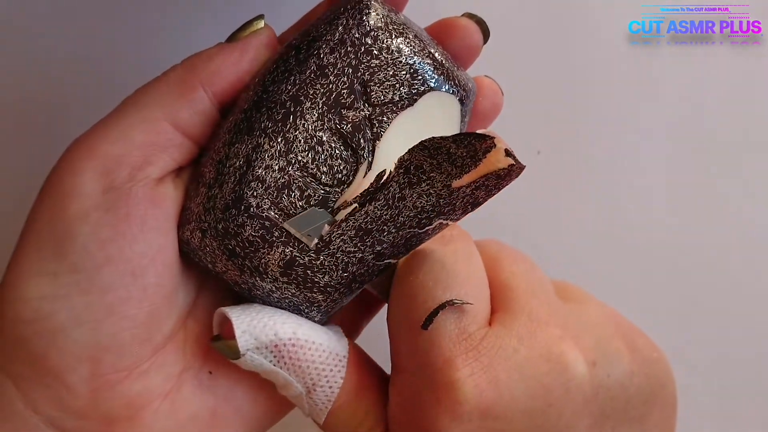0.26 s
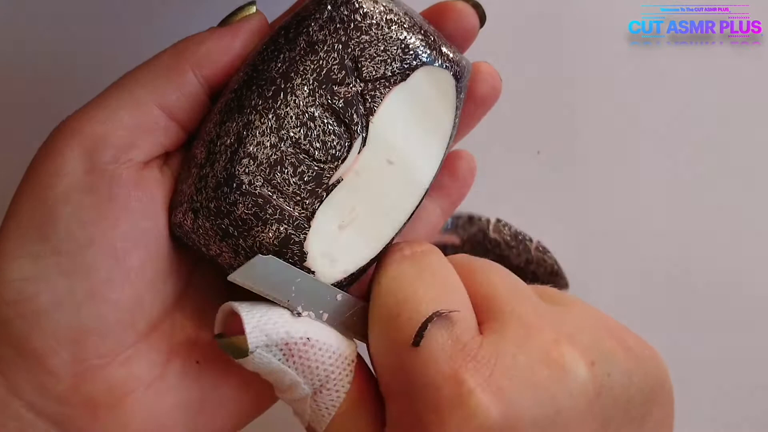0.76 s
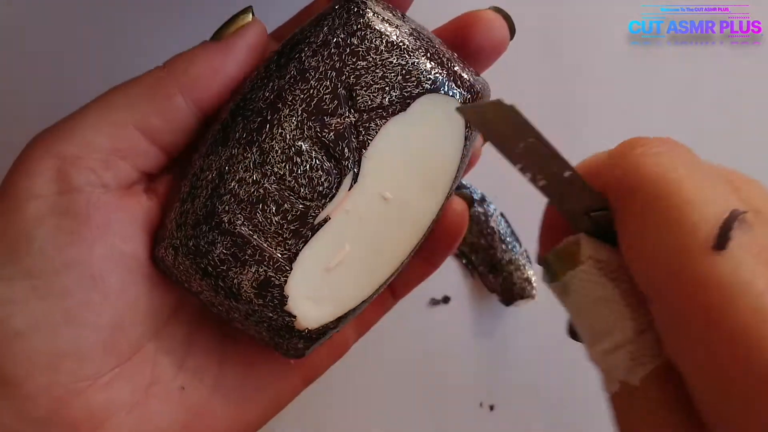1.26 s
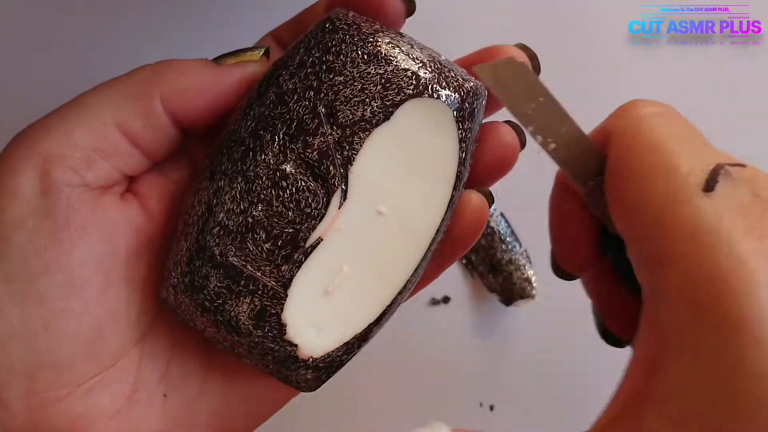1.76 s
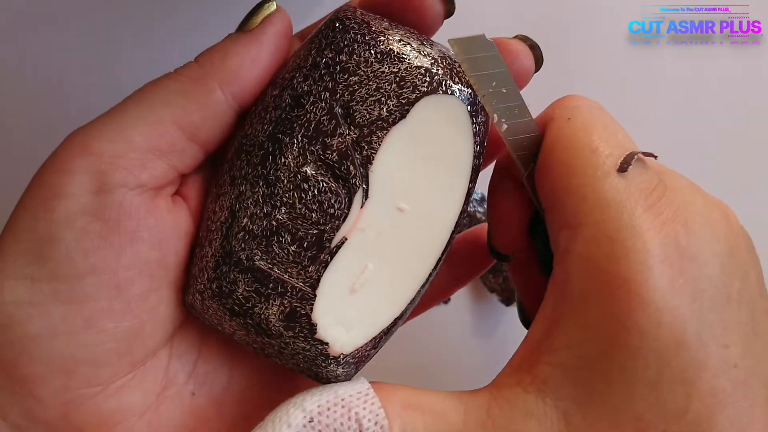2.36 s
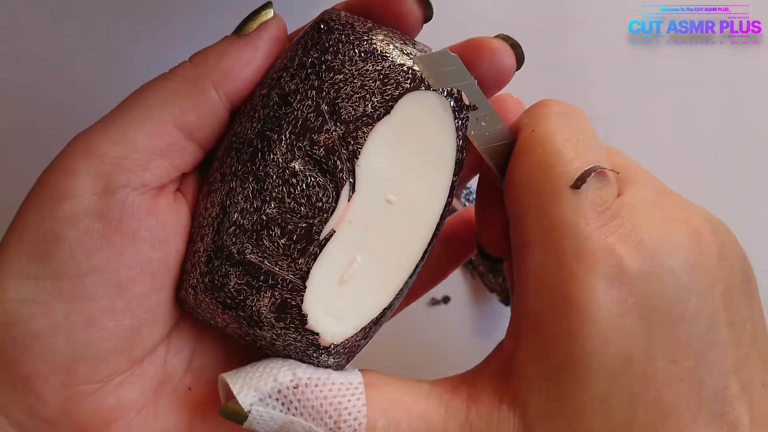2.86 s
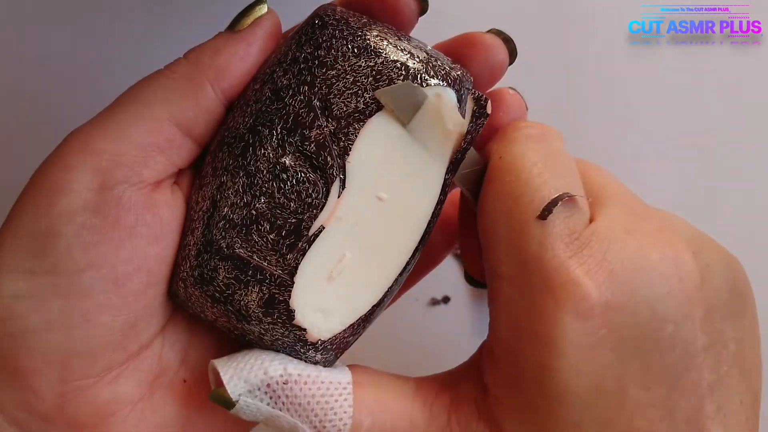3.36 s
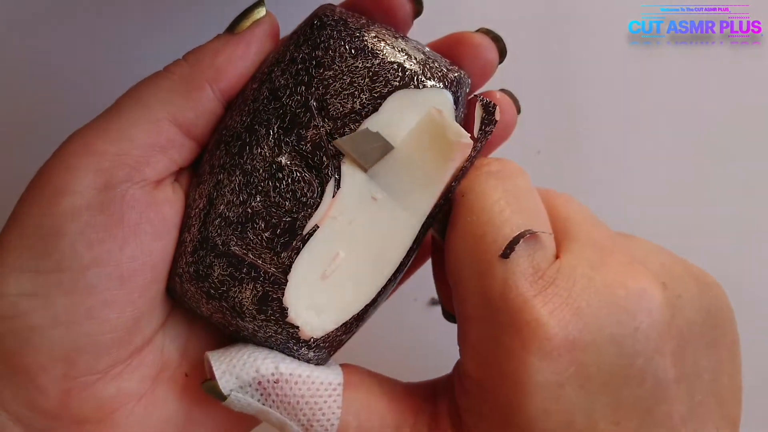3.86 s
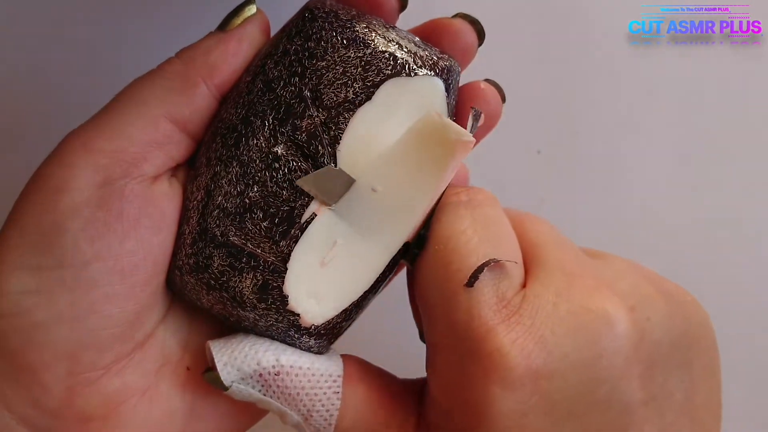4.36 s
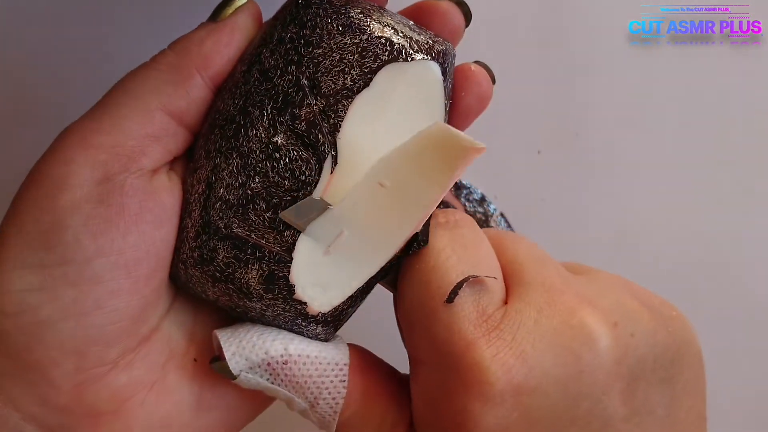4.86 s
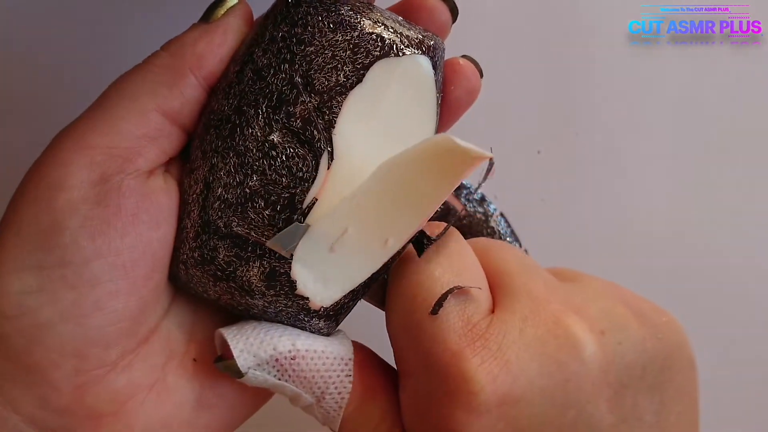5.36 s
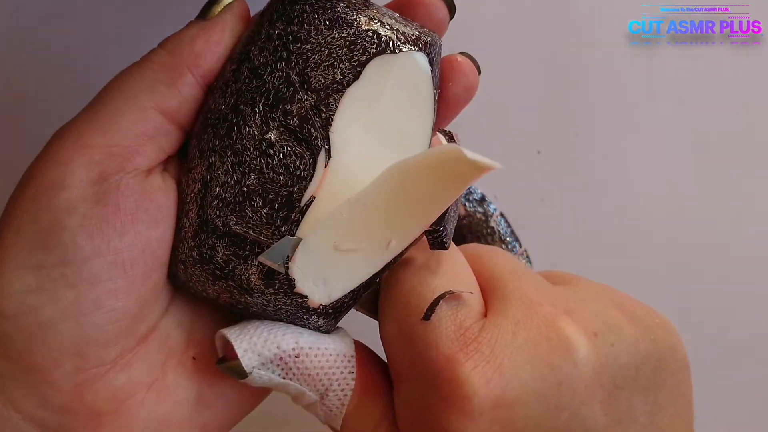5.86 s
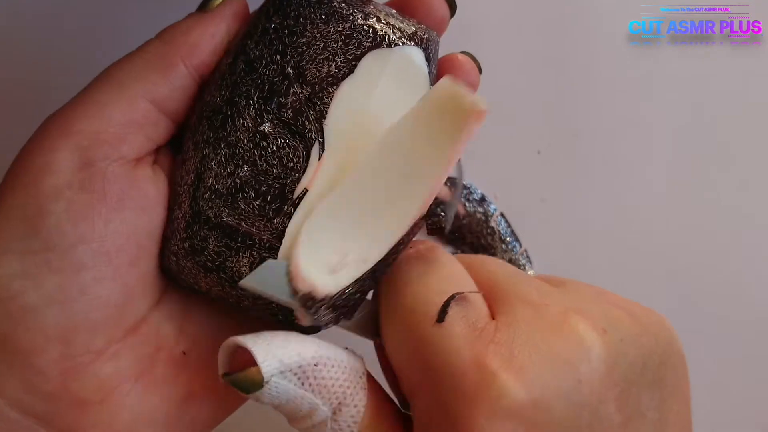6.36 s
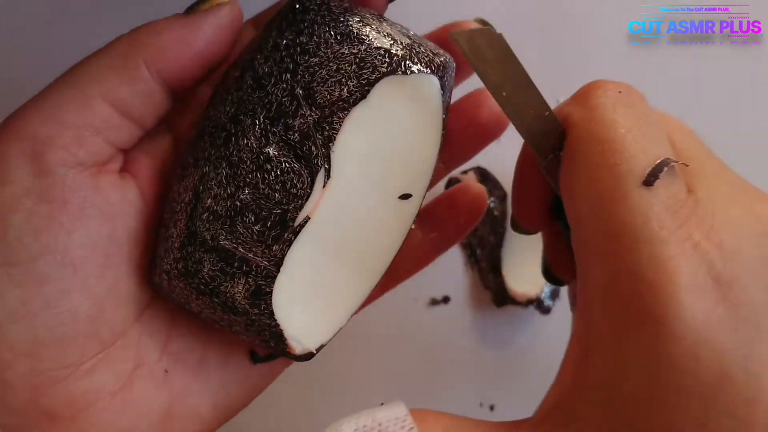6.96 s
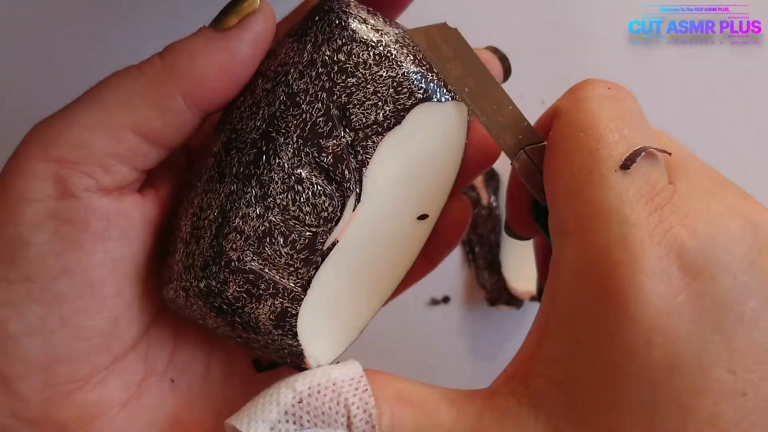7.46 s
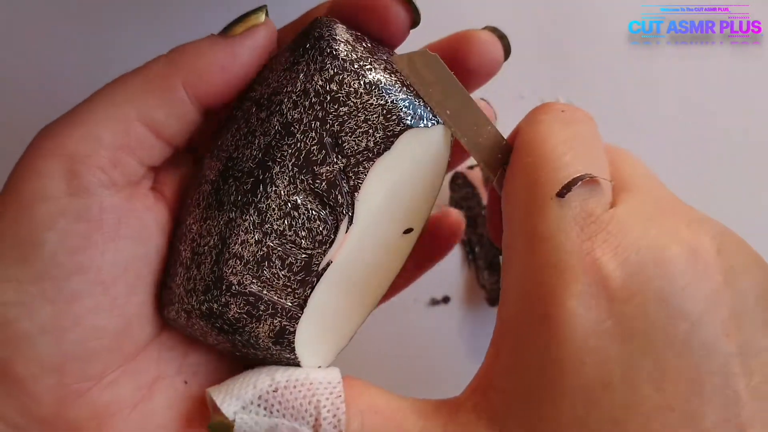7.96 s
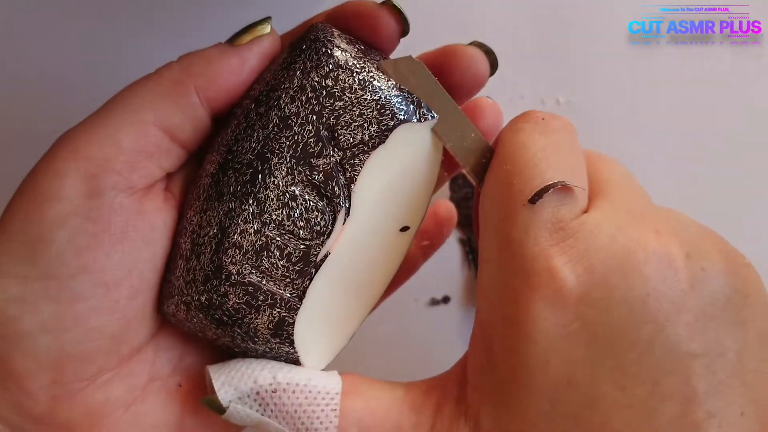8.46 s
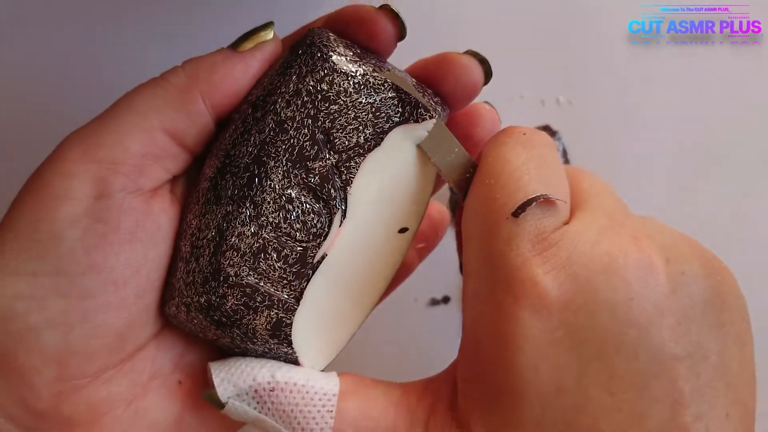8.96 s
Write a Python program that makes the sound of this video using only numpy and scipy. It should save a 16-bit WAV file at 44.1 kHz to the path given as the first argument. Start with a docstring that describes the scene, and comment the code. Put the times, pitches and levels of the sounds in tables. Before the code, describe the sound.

Close stereo pickup in a small room, with steady quiet rumble and hiss. From 0 to 0.3 s a few crisp snaps of brittle coating, then a strong crunch near 0.4. A slice lands at 0.6 with a sharp tick and hollow table thud, bouncing quickly, amid a brief slide. From 0.9 to 2.5 the blade clacks lightly in its handle, with a faint short metallic ping at 1.8 and the clearest clack at 2.5. Sparse snaps begin around 2.6; from 3.1 to 4.9 a soft uneven cutting hiss carries fine bright pops, densest after 3.7. Sparse ticks follow until 5.8, then a dense crunch at 5.9. Dull grip rubbing and small clacks lead to pieces dropping and bouncing at 6.5-6.8. Then near quiet, with faint clacks at 7.4 and 7.85 and a short crunch at 8, leaving only faint rustle and background.

```python
"""A craft knife pares a bar of soap with a hard glitter coat, close to a stereo microphone in a small room.
The coat snaps (short filtered noise clicks) and crunches (rough noise bursts); the cut is an uneven hiss.
Between strokes the blade clacks in its handle: noise rattles with a short pure ring.
Slices drop and bounce twice on a hollow table: noise ticks over a thud of decaying sine waves.
Under it lie the dull rub of a shifting grip, a faint rustle, and a steady background of rumble and hiss."""
import sys
import numpy as np
from scipy import signal
from scipy.fft import rfft, irfft, next_fast_len
from scipy.io import wavfile

SR = 44100
rng = np.random.default_rng(int(sys.argv[2]) if len(sys.argv) > 2 else 0)


def master_out(mix):
    """Clip the mix to full scale and print it as 16-bit PCM to the path in sys.argv[1]."""
    frames = np.transpose(np.atleast_2d(mix))
    ceiling = np.clip(frames, -1, 1)
    pcm = np.round(ceiling * 32767).astype(np.int16)
    wavfile.write(sys.argv[1], SR, pcm)


N = 407043
TIME = np.arange(N) / SR
BURST_SIZE = 4096   # samples in one short burst


def from_db(db):
    """Turn decibels into a gain."""
    return 10 ** (np.asarray(db) / 20)


def rms_one(x):
    """Scale to unit power."""
    return x / np.sqrt(np.mean(x ** 2) + 1e-20)


def at_hz(points, hz):
    """Read a curve between its points; pitch is spaced by ratio, as the ear hears it."""
    point_hz, value = np.transpose(points)
    return np.interp(np.log(np.maximum(hz, 1)), np.log(point_hz), value)


def bins(size):
    """List the frequencies of a transform, with 1 Hz as the lowest."""
    return np.maximum(np.fft.rfftfreq(size, 1 / SR), 1)


def hump(hz, centre_hz, octaves):
    """Shape of a resonance: 1 on top, one half at the given distance in octaves."""
    return 1 / (1 + (np.log2(hz / centre_hz) / octaves) ** 2)


def coloured(x, gain_db):
    """Filter with the given gain per frequency, never sounding before its input (minimum phase)."""
    size = 2 * (len(gain_db) - 1)
    # folding the cepstrum onto positive time makes the filter minimum-phase
    cepstrum = irfft(np.log(from_db(gain_db)))
    cepstrum[1:size // 2] *= 2
    cepstrum[size // 2 + 1:] = 0
    response = np.exp(rfft(cepstrum))
    return irfft(rfft(x, size) * response)[..., :x.shape[-1]]


LONG_HZ = bins(2 * next_fast_len(N // 2 + BURST_SIZE))   # frequencies for full-length noise


def stereo(pair, alike):
    """Mix two unrelated signals into left and right; alike = 1 makes both the same."""
    alike = np.clip(alike, -1, 1)
    middle = np.sqrt((1 + alike) / 2) * pair[0]
    side = np.sqrt((1 - alike) / 2) * pair[1]
    return middle + side * [[1], [-1]]


def stereo_noise(alike):
    """Full-length white noise in two channels."""
    return stereo(rng.standard_normal((2, N)), alike)


def panned(x, pan_db):
    """Left-right balance at constant power; positive is louder on the left."""
    return x * rms_one(from_db([[pan_db / 2], [-pan_db / 2]]))


def add(out, s, x):
    """Mix a sound in at a given time in seconds."""
    i = max(round(s * SR), 0)
    out[:, i:i + x.shape[1]] += x[:, :N - i]


def one_millisecond_level(x):
    """Level of a short sound if its energy were spread over one millisecond."""
    return np.sqrt(np.sum(x ** 2, axis=-1, keepdims=True) / (SR / 1000))


def burst(envelope, colour, db, tilt, pan_db, alike, grain_db, ring_hz=1000, ring_db=0, click=0):
    """Noise with uneven grains: a cluster of tiny fractures or contacts, with db as its strength."""
    hz = bins(BURST_SIZE)
    unevenness = from_db(grain_db * rng.standard_normal(BURST_SIZE))
    grains = rng.standard_normal((2, BURST_SIZE)) * unevenness
    grains[0, 0] += click   # a clean break starts with one sharp pulse
    octaves = np.log2(np.maximum(hz, 1200) / 5000)   # the tilt turns about 5 kHz and stops below 1.2 kHz
    gain_db = at_hz(colour, hz) + tilt * octaves + ring_db * hump(hz, ring_hz, 0.29)
    x = coloured(stereo(grains * envelope, alike), gain_db)
    return from_db(db) * panned(x / one_millisecond_level(x), pan_db)


def swell(seconds):
    """Fractures or contacts multiply up to the given time, then die out."""
    t = TIME[:BURST_SIZE] / max(seconds, 1e-4)
    return t * np.exp(-t)


def background(bass_hz=400):
    """Steady noise split into a slightly related stereo rumble and an almost unrelated hiss."""
    # colour of the background: (frequency [Hz], relative level [dB])
    floor_colour = [(20, -23), (40, -4.5), (75, 1.5), (160, -3), (300, -8.5), (600, -11), (1600, -14),
                    (2500, -20), (3800, -15.5), (5700, -31), (8000, -21.5), (11000, -18), (15500, -19)]
    # narrow bands that stand out: (frequency [Hz], half width [octaves], boost [dB])
    floor_peaks = [(1056, 0.016, 10.5), (2176, 0.13, 12.5)]
    level_db = -56.5
    colour_db = at_hz(floor_colour, LONG_HZ)
    colour_db = colour_db + sum(db * hump(LONG_HZ, hz, width) for hz, width, db in floor_peaks)
    bass_share = 1 / (1 + (LONG_HZ / bass_hz) ** 2)
    rumble = coloured(stereo_noise(alike=0.21), colour_db + 10 * np.log10(bass_share))
    hiss = coloured(stereo_noise(alike=0.049), colour_db + 10 * np.log10(1 - bass_share))
    return from_db(level_db) * panned(rms_one(rumble + hiss), pan_db=-3.0)


def room(x, early_db=5, early_s=0.069, first_s=0.0011, alike_hz=800):
    """Close reflections off table and hands, then a diffuse tail that lasts longest in the bass."""
    # time to fade by 60 dB: (frequency [Hz], time [s])
    room_t60 = [(200, 1.07), (1700, 0.5251), (3800, 0.7643), (9000, 0.4678), (16000, 0.37)]
    # colour of the echoes: (frequency [Hz], relative level [dB])
    room_colour = [(100, 3), (800, 4.5), (3500, 0.5), (8000, 2), (16000, 0)]
    t = TIME[:SR * 3 // 4]
    hz, centres = bins(2 * len(t)), np.geomspace(125, 16000, 8)
    white = rfft(rng.standard_normal((2, 2 * len(t))))
    # long waves reach both capsules alike
    white = stereo(white, alike=1 / (1 + (hz / alike_hz) ** 2))
    response = 0
    for centre, share in zip(centres, np.eye(len(centres))):
        band_gain = np.interp(np.log(hz), np.log(centres), share)
        band = irfft(white * band_gain)[:, :len(t)]
        fade_db = -60 * t / at_hz(room_t60, centre)
        response = response + band * from_db(at_hz(room_colour, centre) + fade_db)
    early_boost = from_db(early_db * np.exp(-t / early_s))
    onset = np.clip(t / first_s - .5, 0, 1)   # silent until the first reflection
    response = response * early_boost * onset
    response /= np.sqrt(np.sum(response ** 2) / 2)
    return signal.fftconvolve(x, response, axes=1)[:, :N]


def rub():
    """Dull rumble of skin dragging on the bar, only while the grip shifts."""
    # colour of the rub: (frequency [Hz], relative level [dB])
    rub_colour = [(40, -25), (100, -6), (160, 2), (230, -7.5), (320, -20), (600, -29), (2000, -55)]
    # the hand shifts its grip: (time [s], level [dB])
    grip_levels = [(6.06, -64), (6.12, -42.5), (6.2, -46), (6.26, -41), (6.3, -47), (6.42, -54.5),
                   (6.5, -32.5)]
    x = coloured(stereo_noise(alike=0.7838), at_hz(rub_colour, LONG_HZ))
    level_db = np.interp(TIME, *np.transpose(grip_levels), left=-np.inf, right=-np.inf)
    return from_db(level_db) * panned(rms_one(x), pan_db=-4.0)


def contacts():
    """List every landing and its two bounces: (s, tick dB, tilt, swell s, thud dB)."""
    # pieces land: (time [s], tick strength [dB], tilt [dB per octave], swell [s],
    # thud strength [dB], time to the first bounce [s]); strengths before the mix
    landing_list = [(0.588, -3.5, 1, 0.0015, -15, .057), (0.714, -16, -2.5, .0015, -21, 0.023),
                    (6.4706, -19, -1, .0041, -17, .054), (6.5229, -10.5, 1, 0.0011, -30, 0.011),
                    (6.527, -12.5, -1.5, 0.0047, -27, .037), (6.64, -24, 3.5, 0.0059, -31, 0.094)]
    gap_ratio = 0.93   # the second gap against the first
    # losses each time the count of contacts doubles [dB, dB, dB per octave]
    tick_loss, thud_loss, dulling = 19, 4.5, 9
    for s, tick_db, tilt, seconds, thud_db, gap_s in landing_list:
        for k in range(3):
            spent = np.log2(1 + k)
            yield s, tick_db - tick_loss * spent, tilt - dulling * spent, seconds, thud_db - thud_loss * spent
            s += gap_s * gap_ratio ** k


def landings(thud_db=-3, spread_db=2, phase_spread=0.52, build_cycles=0.93):
    """Each piece ticks on the table and sets its modes ringing, differently at every contact."""
    # colour of the ticks: (frequency [Hz], relative level [dB])
    land_colour = [(35, -13), (100, -8.5), (450, -4.5), (850, 3), (1400, -2.5), (2200, -4), (5500, -6),
                   (8500, -8), (16000, -9)]
    # ringing tones of the table top: (frequency [Hz], relative level [dB], time to fade by 60 dB [s])
    table_modes = [(88.4, -11.5, 0.13), (128.8, -24, 0.33), (159.4, -25, 0.33), (221.6, -12.5, 0.27),
                   (311.95, -8, 0.22), (450.7, -8, 0.12), (480.3, -26.5, 0.15), (533.5, -8, 0.1),
                   (709, -9.5, 0.1582), (768, -3, 0.1), (854, -3.5, 0.082), (923, -8, 0.095),
                   (1076, -20, 0.16), (1240, -16, .22), (1370, -19.5, 0.11)]
    ticks, thuds, t = np.zeros((2, N)), np.zeros((2, N)), TIME[:SR // 2]
    mode_hz, mode_db, t60 = np.transpose(table_modes)[:, :, None]
    for s, db, tilt, seconds, weight_db in contacts():
        tick = burst(swell(seconds), land_colour, db, tilt, pan_db=-1.5, alike=0.24, grain_db=9)
        add(ticks, s, tick)
        uneven_db = spread_db * rng.standard_normal(mode_hz.shape)
        strength = from_db(weight_db + thud_db + mode_db + uneven_db)
        phase = rng.uniform(0, 2 * np.pi, mode_hz.shape)
        # left and right hear slightly different phases [radians]
        phase = phase + phase_spread * rng.standard_normal((2, *mode_hz.shape))
        # the low modes take longest to spread through the board
        envelope = (1 - np.exp(-t * mode_hz / build_cycles)) * from_db(-60 * t / t60)
        tones = strength * envelope * np.sin(2 * np.pi * mode_hz * t + phase)
        add(thuds, s, np.sum(tones, axis=1))
    return ticks, panned(thuds, pan_db=-3.5)


def clacks():
    """The blade rattles in its plastic handle and against the bar; each knock rings for a few cycles."""
    # colour of the rattle: (frequency [Hz], relative level [dB])
    clack_colour = [(200, -22), (550, -27), (800, -7.5), (1300, -13.5), (1900, 4), (2400, -0.5), (3100, -6),
                    (4200, -3.5), (6000, -12.5), (9000, -18.5), (16000, -22.5)]
    # the knife clacks: (time [s], strength before the mix [dB], tilt [dB per octave],
    # swell [s], resonance [Hz])
    clack_list = [(0.879, -20.5, 2.5, 0.0066, 2060), (1.1318, -31.5, 1, 0.001907, 2230),
                  (1.2235, -35.5, 2, 0.0017, 2383), (1.7945, -27, 4, 0.0014, 4500),
                  (2.0598, -27.5, -1, 0.0012, 1930), (2.1864, -22.5, -0.5, 0.0013, 1840),
                  (2.4848, -12, 2, 0.002, 2190), (6.1016, -20.5, -1, .0012, 2074),
                  (6.24, -25, 3, 0.0007288, 1019), (6.3583, -26, 0.5, 0.0042, 2364),
                  (7.3646, -34.5, -4, 0.0017, 1940), (7.3767, -25, 2, 0.0012, 2185),
                  (7.8546, -31, 5.5, 0.0014, 3700)]
    # the flicked free blade: (frequency [Hz], peak before the mix [dB], time to fade by 60 dB [s])
    blade_ping = (4565, -46, 0.17)
    ping_s = 1.795   # moment of the flick
    pan_db, knock_db = -2, -3   # left-right; pure ring against the rattle
    rattles, knocks = np.zeros((2, N)), np.zeros((2, N))
    for s, db, tilt, seconds, hz in clack_list:
        envelope = swell(seconds)
        rattle = burst(envelope, clack_colour, db, tilt, pan_db, alike=0.29, grain_db=2.0,
                       ring_hz=hz, ring_db=0.5)
        add(rattles, s, rattle)
        knock = envelope * np.sin(2 * np.pi * hz * TIME[:BURST_SIZE])
        knock /= one_millisecond_level(knock)
        add(knocks, s, from_db(db + knock_db) * panned(knock, pan_db))
    hz, db, t60 = blade_ping
    t = TIME[:SR]
    ping = from_db(db - 60 * t / t60) * np.sin(2 * np.pi * hz * t)
    add(rattles, ping_s, ping * np.ones((2, 1)))
    return rattles, knocks


def sliding():
    """Level of the slides: each builds up, holds and dies away, over the rustle of the grip."""
    # blade slides through soap or fingers over the coat: (start [s], end [s], level before unevenness [dB])
    slide_list = [(0, 0.044, -53.5), (0.48, 0.73, -53), (0.953, 1.034, -48), (1.096, 1.395, -59.5),
                  (2.663, 2.81, -61), (3.077, 4.887, -61), (5.852, 6.38, -57.5), (6.546, 6.82, -52)]
    attack_s, release_s = 0.028, 0.069
    hold_db = -74   # faint rustle of the bar held in the hand
    start, end, db = np.transpose(slide_list)[:, :, None]
    t = TIME[::64]   # a coarse clock is enough for a slow level
    fade = np.maximum(start - t, 0) / attack_s + np.maximum(t - end, 0) / release_s
    level = np.max(from_db(db) * np.exp(-fade), axis=0)
    return np.interp(TIME, t, np.maximum(level, from_db(hold_db)))


def scrape(per_s=350, grain_db=5.5, grain_share_db=2.5, uneven_db=4.5):
    """Soft, uneven hiss of the cut with a sprinkle of glitter grains popping under the edge."""
    # colour of the scrape: (frequency [Hz], relative level [dB])
    scrape_colour = [(500, -28), (2000, 1), (3800, 0.5), (4800, -3), (6000, 2), (9000, 0), (13000, 4),
                     (16000, -5.5)]
    knots = np.arange(0, TIME[-1], .025)   # the drag wanders in steps of 25 ms
    drag_db = uneven_db * np.interp(TIME, knots, rng.standard_normal(len(knots)))
    level = sliding() * from_db(drag_db)
    born = rng.random(N) < per_s / SR
    size = from_db(grain_db * np.minimum(rng.exponential(1, N), 3.5))
    # each pop dies away in 1.7 ms
    grains = rms_one(signal.lfilter([1], [1, -np.exp(-1 / (0.0017 * SR))], born * size + 1e-18))
    hiss = rms_one(coloured(stereo_noise(alike=0.068), at_hz(scrape_colour, LONG_HZ)))
    popping = np.hypot(1, from_db(grain_share_db) * grains)
    return level * panned(hiss * popping, pan_db=1.0)


def cracks():
    """A crack runs through the coat as a rough burst of fractures."""
    # colour of the cracks: (frequency [Hz], relative level [dB])
    crack_colour = [(150, -29.5), (550, -26.5), (800, -7.5), (1100, -13), (1800, -10.5), (2600, -6),
                    (4000, -7.5), (6000, -3.5), (10000, -4.5), (14000, -0.5), (16000, -5.5)]
    # runs of fractures: (time [s], strength before the mix [dB], left-right [dB],
    # swell [s], flake resonance [Hz])
    crack_list = [(0.358, -12.5, 2.5, 0.0023, 4300), (0.3694, -7, -5.5, 0.0072, 3950),
                  (0.3953, -2.5, -0.5, 0.0034, 4100), (2.548, -21.5, -1, 0.0023, 5300),
                  (4.8721, -21.5, -2, 0.001502, 3700), (5.9239, -17.5, 14, 0.0017, 4029),
                  (5.9325, -8, -7, 0.01, 3938), (5.946, -5, 3, 0.000784, 13300),
                  (5.9505, -7, 1.5, 0.0017, 14300), (5.967, -7.5, 0, .0013, 7800),
                  (6.338, -24, 2.5, 0.006, 2314), (7.9789, -10, -6, 0.006, 3700),
                  (7.9824, -10.5, 2, 0.0035, 3400)]
    out = np.zeros((2, N))
    for s, db, pan_db, seconds, hz in crack_list:
        tilt = -2.4 - 0.2 * db   # dB per octave: small, weak flakes sound brighter
        crack = burst(swell(seconds), crack_colour, db, tilt, pan_db, alike=.05, grain_db=7.5,
                      ring_hz=hz, ring_db=14)
        add(out, s, crack)
    return out


def scatter():
    """Faint snaps at random moments of each spell of crackle: (s, strength dB, tilt)."""
    # the blade is in the coat: (start [s], end [s], snaps per second [1/s],
    # middle strength before the mix [dB], middle tilt [dB per octave])
    crackle_list = [(2.752, 3.7, 9.2, -39, -3), (3.749, 4.8, 14, -37.5, 11), (5.807, 5.92, 30, -32, -5)]
    spread_db, tilt_spread = -1, 3   # each multiplied by a random number from -2 to 2
    rows = []
    for start, end, per_s, db, tilt in crackle_list:
        gaps, spread = rng.exponential(1, 64), rng.uniform(-2, 2, (64, 2))
        times = start + np.cumsum(gaps) / max(per_s, 1)
        for s, (a, b) in zip(times, spread):
            if s < end:
                rows.append((s, db + spread_db * a, tilt + tilt_spread * b))
    return rows


def snaps(crack_s=.0001, flutter_s=0.0023, flutter_db=-12):
    """One sharp break of the coat, then the flake flutters for a millisecond or two."""
    # colour of the snaps: (frequency [Hz], relative level [dB])
    snap_colour = [(300, -46), (1600, -29), (2600, -12.5), (4000, -3), (5500, -9), (10500, -10.5),
                   (13000, 1), (16000, -6)]
    # the clearest snaps: (time [s], strength before the mix [dB], tilt [dB per octave])
    snap_list = [(0.0156, -19, -3), (0.1943, -34.5, -4.5), (0.225, -11, 0), (0.2906, -27.5, -2),
                 (0.576, -21.5, 0), (2.659, -22.5, 3.5), (2.7357, -23.5, -4), (2.9201, -28.5, -5),
                 (3.062, -31, -5.5), (3.674, -20, 6), (3.783, -30, 9), (3.8215, -14, 9), (3.916, -22, 7),
                 (3.9347, -27.5, -1.5), (3.9768, -26.5, 5), (4.0411, -22.5, 9), (4.075, -18, 11.5),
                 (4.132, -22.5, 12), (4.2748, -22, 9.5), (4.359, -19.5, 9.5), (4.3925, -22, 7),
                 (4.448, -12.5, 4), (4.4768, -24.5, 1.5), (4.4938, -28.5, 2), (4.5506, -24.5, 0.5),
                 (4.6344, -23.5, 3.5), (4.699, -22.5, 2.5), (4.8015, -27, 0.5), (4.8563, -25, 4),
                 (5.306, -28.5, 5), (5.3739, -33.5, -1), (5.409, -34, 1.5), (5.511, -27.5, 3),
                 (5.536, -28, 1.5), (5.5779, -23, -4.5), (5.7711, -33.5, -2), (5.8587, -30, 0),
                 (5.8764, -13, 1), (5.9005, -21, -0.5), (6.311, -25.5, -0.5), (6.449, -31, -7),
                 (6.465, -23, -1)]
    out, t = np.zeros((2, N)), TIME[:BURST_SIZE]
    envelope = np.exp(-t / crack_s) + from_db(flutter_db) * np.exp(-t / flutter_s)
    for s, db, tilt in snap_list + scatter():
        pan_db = 0.5 + 0.21 * tilt   # the finest, brightest chips fly off to the left
        add(out, s, burst(envelope, snap_colour, db, tilt, pan_db, alike=0.39, grain_db=4, click=2.5))
    # the cut is nearer to the left capsule and reaches it a few samples sooner
    out[1] = np.roll(out[1], 5)
    return out


def scene():
    """Mix the close sounds with their room echo; ticks and clacks carry the most echo for their level."""
    snap, crack = snaps(), cracks()
    clack, knock = clacks()
    tick, thud = landings()
    direct = from_db(0.5) * snap + from_db(0.3) * crack + from_db(1.8) * clack
    direct = direct + from_db(3.0) * tick + thud + knock
    sent = from_db(-13.5) * snap + from_db(-11.0) * crack + from_db(-6) * clack
    sent = sent + from_db(-3.5) * tick + from_db(-21.0) * thud + from_db(-11) * knock
    return direct + room(sent) + scrape() + rub() + background()


def record(dry):
    """Flatten peaks beyond full scale, then cut the top of the treble steeply."""
    cutoff_hz = 16300
    top_cut = signal.ellip(10, .2, 70, cutoff_hz, fs=SR, output="sos")
    return signal.sosfilt(top_cut, np.clip(dry, -1, 1))


dry = scene()
out = record(dry)
master_out(out)
```